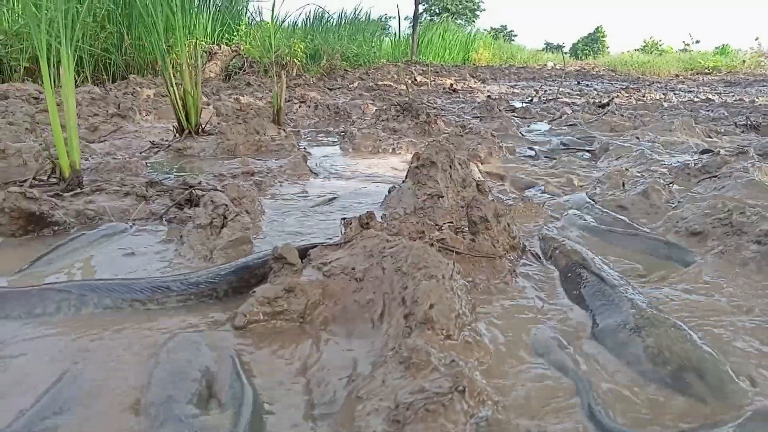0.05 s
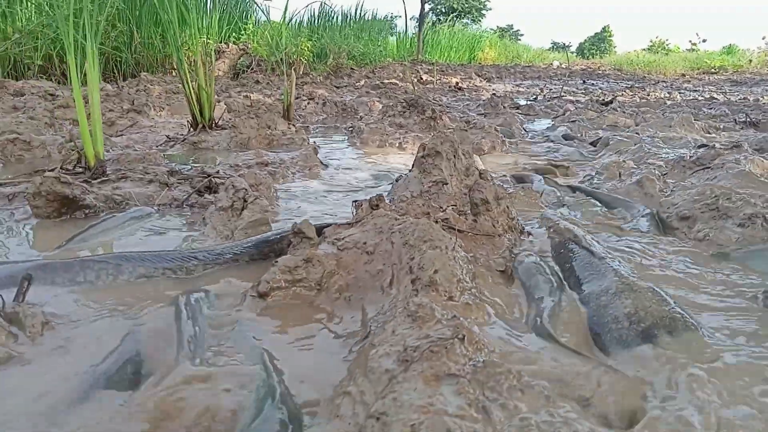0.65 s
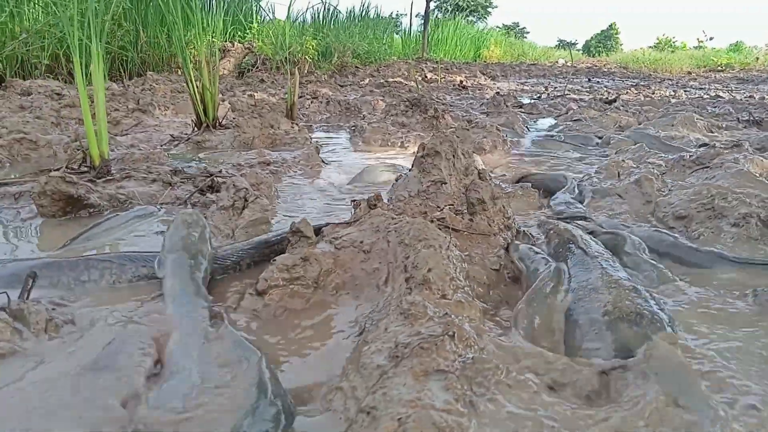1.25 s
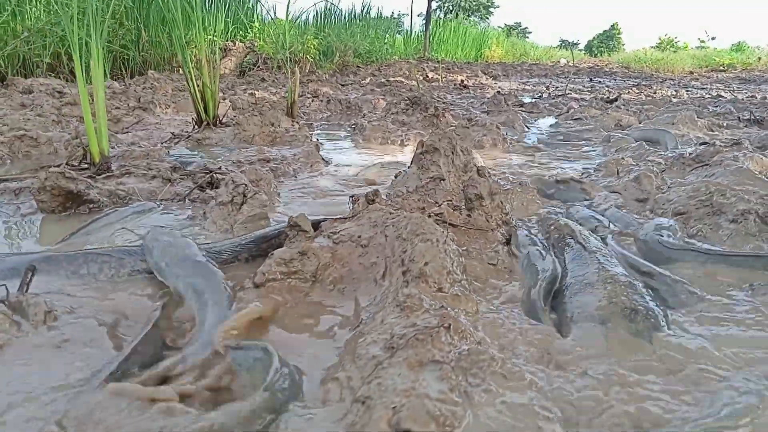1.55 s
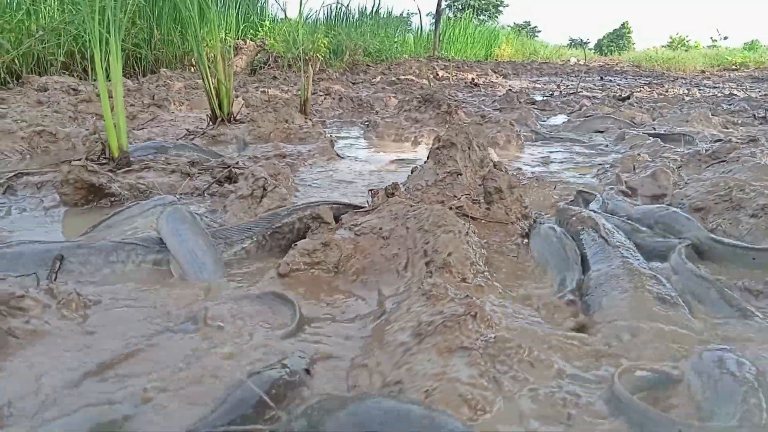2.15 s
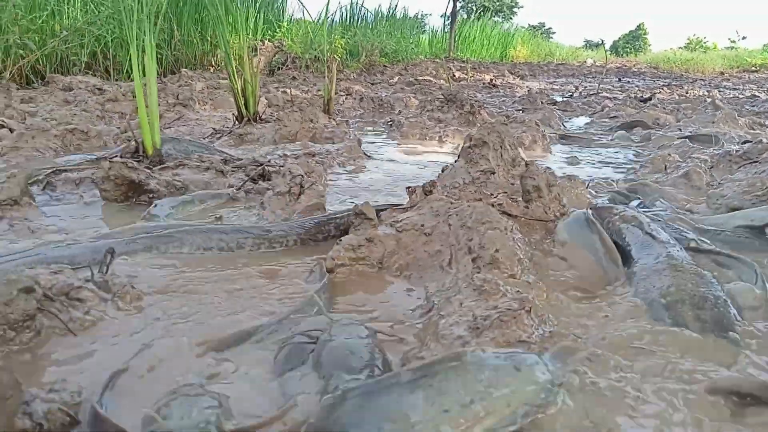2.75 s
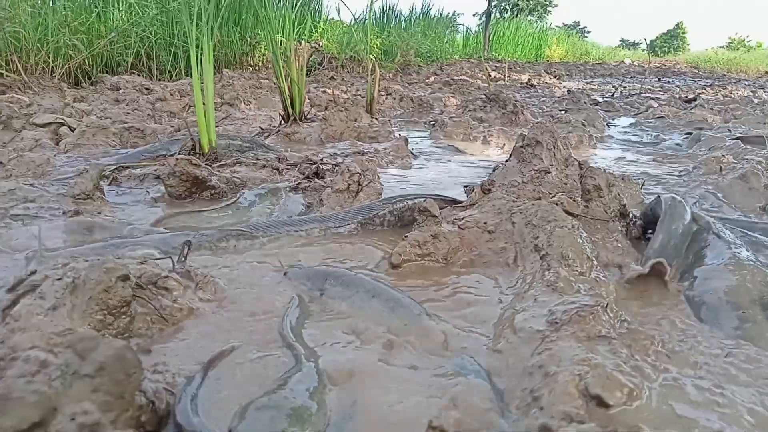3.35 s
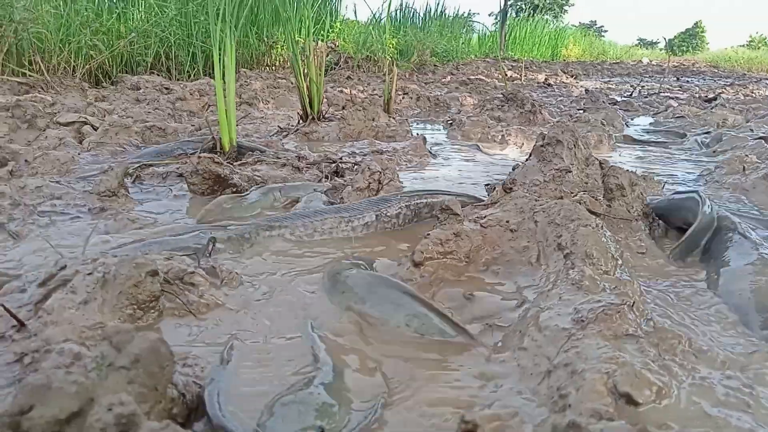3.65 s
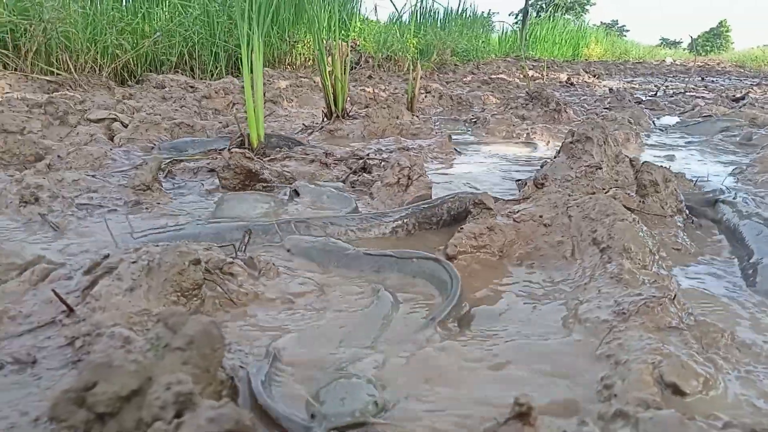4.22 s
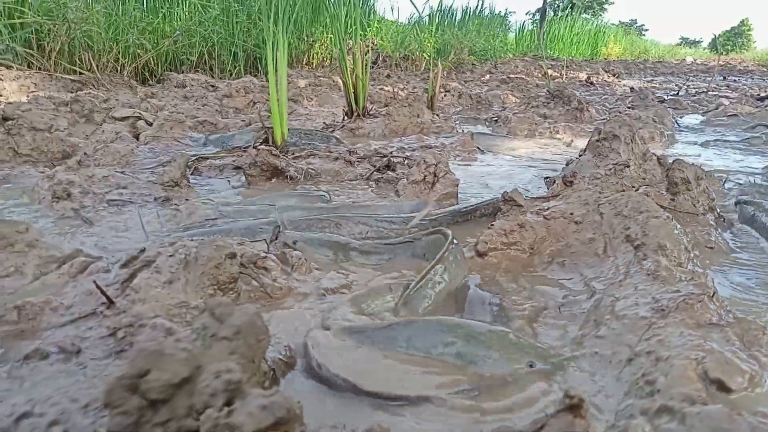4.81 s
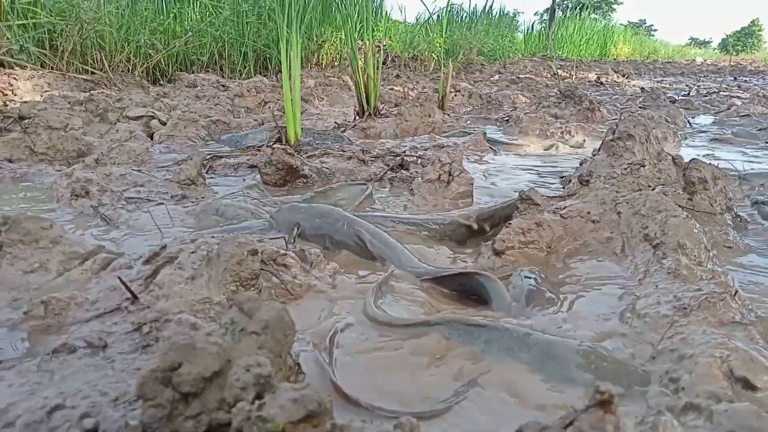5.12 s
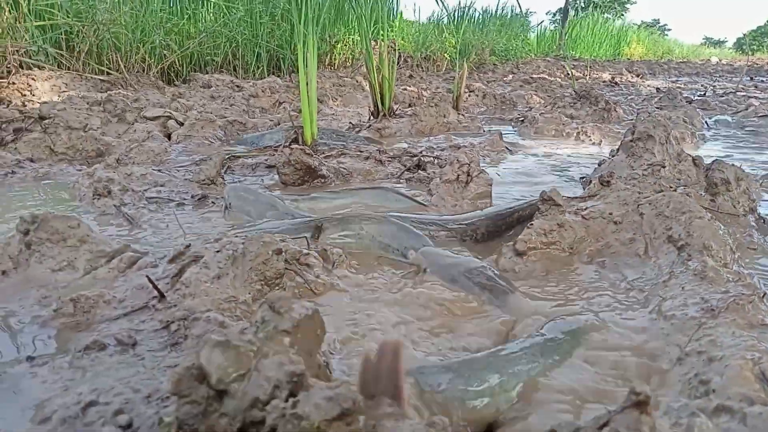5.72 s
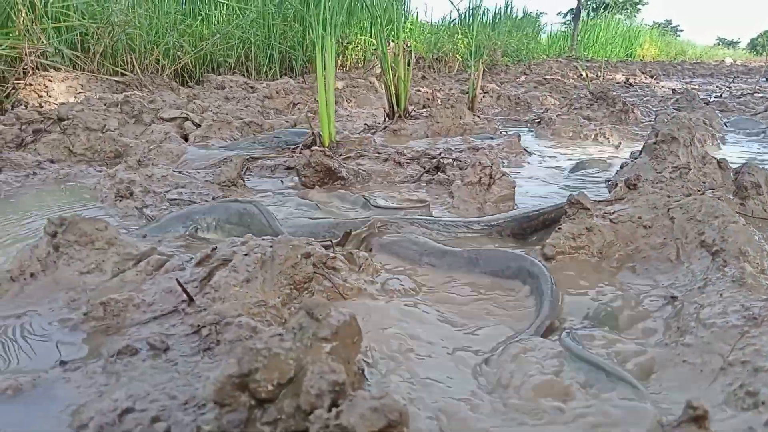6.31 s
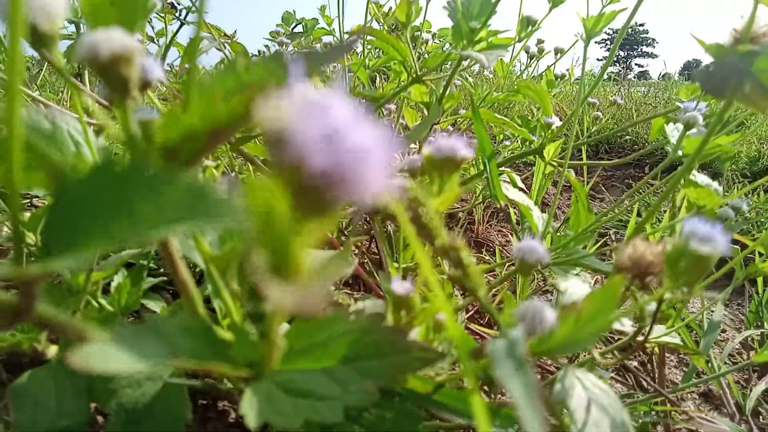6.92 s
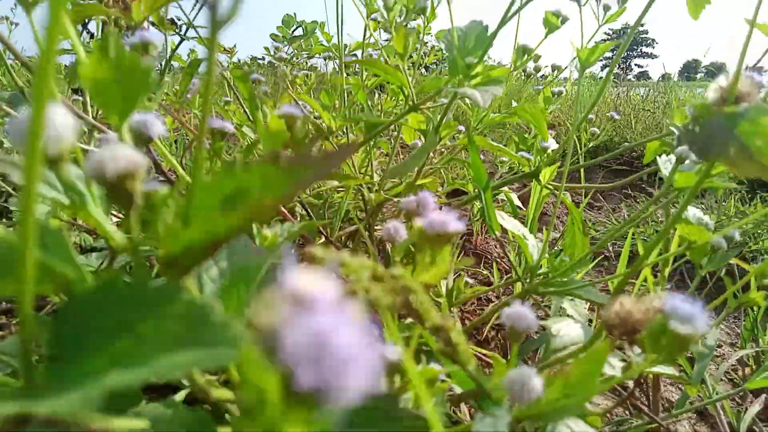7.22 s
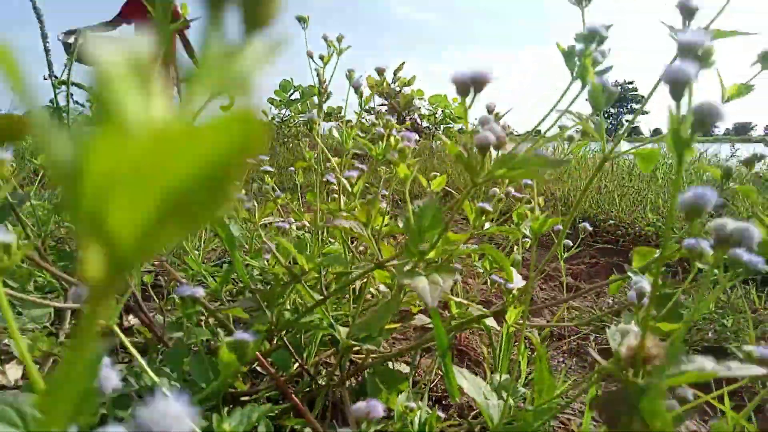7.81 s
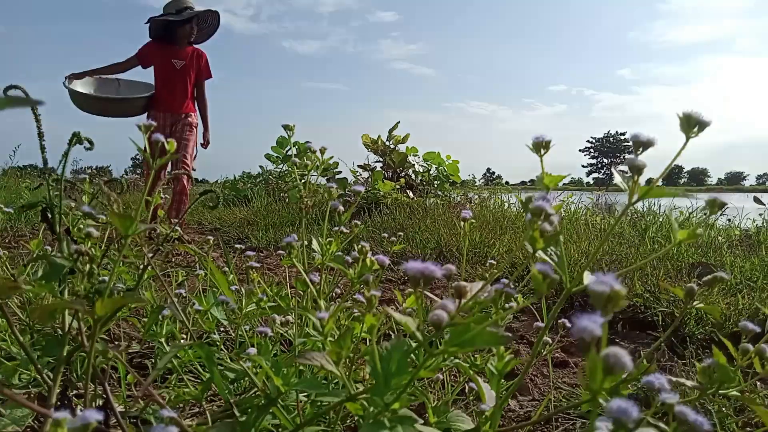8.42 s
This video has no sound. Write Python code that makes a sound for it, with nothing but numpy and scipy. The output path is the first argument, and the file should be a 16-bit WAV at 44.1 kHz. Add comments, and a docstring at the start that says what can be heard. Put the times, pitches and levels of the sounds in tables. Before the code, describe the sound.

Fish thrash close by in a shallow mud puddle, sloshing the water with quick pops, gurgles, drips and wet smacks. Midway, their tails thud and the mud rumbles softly. A small bird chirps faintly over open air and a low hum. Near the end the water sounds cut off, leaving a quiet meadow with swishing plants, far scuffs in the grass, a faint high buzz and one more chirp.

```python
"""Catfish thrash in a shallow mud puddle beside a rice field, over open air and a low hum.
From the start the water sloshes and froths, and air trapped by their bodies gurgles and pops as bubbles.
Wet skin smacks out of the mud and tails thud on the bed; from about 3 s shoving bodies make it rumble.
A small bird first chirps at 5.4 s. Near 6.9 s the puddle sounds cut off, and one hears quiet meadow air,
swishing plants, far scuffs in the grass, a faint high buzz and one more chirp."""
import sys
import numpy as np
from scipy import signal
from scipy.fft import rfft, irfft, next_fast_len
from scipy.io import wavfile

SR = 44100
rng = np.random.default_rng(int(sys.argv[2]) if len(sys.argv) > 2 else 0)


def persist_wave(psi):
    """Save psi, clipped to +-1, as 16-bit WAV."""
    counts = np.round(np.clip(psi, -1, 1) * 32767).astype(np.int16)
    wavfile.write(sys.argv[1], SR, np.atleast_2d(counts).T)


N = 377483
TIME = np.arange(N) / SR
PUDDLE_END_S = 6.83


def from_db(db):
    """Decibels to gain."""
    return 10 ** (np.asarray(db) / 20)


def unit_rms(x):
    """Scale to rms 1."""
    return x / np.sqrt(np.mean(x ** 2) + 1e-20)


def curves(rows):
    """Each column after time_s, interpolated to every sample."""
    time_s, *columns = np.transpose(rows)
    return [np.interp(TIME, time_s, column) for column in columns]


def value_at(curve, time_s):
    """One sample of a curve."""
    return curve[min(int(time_s * SR), N - 1)]


def add(out, start_s, sound):
    """Mix a short sound in."""
    start = int(np.clip(round(start_s * SR), 0, N - 1))
    out[start:start + len(sound)] += sound[:N - start]


def sine(pitch_hz):
    """Sine following a pitch curve."""
    return np.sin(2 * np.pi * np.cumsum(pitch_hz) / SR)


def drift(rate_hz):
    """Smooth random wander, rms 1."""
    size = next_fast_len(N)
    hz = np.arange(size // 2 + 1) * SR / size
    spectrum = rfft(rng.standard_normal(size)) / (1 + (hz / rate_hz) ** 2)
    return unit_rms(irfft(spectrum, size)[:N])


def coloured(x, spectrum):
    """Filter by a (freq_hz, gain_db) curve, falling 24 dB/octave past its ends; rms 1."""
    size = next_fast_len(N)
    log_hz = np.log2(np.maximum(np.arange(size // 2 + 1) * SR / size, 1))
    freq_hz, gain_db = np.transpose(spectrum)
    knots = np.log2(freq_hz)
    outside_oct = np.abs(log_hz - np.clip(log_hz, knots[0], knots[-1]))
    gain = from_db(np.interp(log_hz, knots, gain_db) - 24 * outside_oct)
    return unit_rms(irfft(rfft(x, size) * gain, size)[:N])


def noise(spectrum):
    """Steady coloured noise, rms 1."""
    return coloured(rng.standard_normal(N), spectrum)


def band(x, centre_hz, width_oct, order=1):
    """Band-pass, width_oct either side of the centre."""
    edges_hz = np.clip(centre_hz * 2 ** (width_oct * np.array([-1, 1])), 100, .45 * SR)
    return signal.sosfilt(signal.butter(order, edges_hz, "band", fs=SR, output="sos"), x)


def ticks(size, per_s, spread_db):
    """Random clicks of either sign: many faint, a few sharp."""
    strength = from_db(spread_db * np.minimum(rng.exponential(1, size), 3))
    sign = rng.choice([-1, 1], size)
    return strength * sign * (rng.random(size) < per_s / SR)


def bubble(pitch_hz, life_s, rise_per_s, onset_per_cycle=2.6, wobble=.027, ragged_db=3.5):
    """An air pocket rings, climbs in pitch as it surfaces and dies ever faster as its film opens."""
    t = np.arange(int(life_s * SR) + 2) / SR
    cycles = pitch_hz * t
    # shifting mud squeezes level and pitch every few cycles
    squeeze = np.interp(cycles / 3, np.arange(24), rng.standard_normal(24)) * np.minimum(cycles / 6, 1)
    onset = 1 - np.exp(-onset_per_cycle * cycles)
    decay = from_db(ragged_db * squeeze - 60 * (t / life_s) ** 1.99)
    return onset * decay * sine(pitch_hz * (1 + rise_per_s * t + wobble * squeeze))


# Open air spectrum: freq_hz, gain_db
AIR_SPECTRUM = [(20, -48), (35, -45), (65, -11), (100, -3), (135, -0.5), (200, -10.5), (320, -15),
                (600, -18), (1100, -23.5), (2600, -30.5), (4000, -37), (6000, -46.5)]

def air(level_db=-52, drop_db=1.5, quieter_from_s=6.7):
    """Meadow air, slightly quieter near the end."""
    return from_db(level_db - drop_db * (TIME > quieter_from_s)) * noise(AIR_SPECTRUM)


def hum(level_db=-60, pitch_hz=137, width_hz=26):
    """A far, wavering hum."""
    return from_db(level_db) * unit_rms(drift(width_hz) * np.sin(2 * np.pi * pitch_hz * TIME))


# How hard the fish churn the water: time_s, level_db
CHURN_CURVE = [(0.04, -50.5), (0.45, -53.5), (0.6, -52), (0.76, -48.5), (1.21, -54), (1.47, -49),
               (1.69, -50), (2.16, -49), (2.31, -47.5), (2.68, -49), (3.14, -48), (3.5, -50.5), (3.89, -51),
               (4.22, -50.5), (4.43, -50.5), (6.03, -53), (6.63, -51.5), (6.72, -49.5)]
# Far splash spectrum: freq_hz, gain_db
SLOSH_SPECTRUM = [(200, 0), (400, 2.5), (700, 0), (1200, -5), (2400, -1.5), (3500, -8.5), (4500, -15),
                  (6000, -46)]

def slosh(churn_db, gain_db=-3, flicker_db=3.3, flicker_hz=55):
    """Farther splashes merge into a soft wash, each band flickering on its own."""
    wash = np.zeros(N)
    for centre_hz in np.geomspace(280, 4500, 7):
        splash = band(rng.standard_normal(N), centre_hz, 1 / 3, order=2)
        wash += splash * from_db(flicker_db * drift(flicker_hz))
    gate = np.clip((PUDDLE_END_S - TIME) / .024, 0, 1)
    return gate * from_db(churn_db + gain_db) * coloured(wash, SLOSH_SPECTRUM)


# Froth on the puddle: time_s, level_db
FROTH_CURVE = [(0, -60), (.57, -61.5), (1.5, -59), (3.2, -55.5), (4.6, -62.5), (6.8, -62), (6.86, -65.5),
               (7.05, -73), (8.56, -74.5)]
# Froth spectrum: freq_hz, gain_db
FROTH_SPECTRUM = [(3000, 11.5), (4500, -3), (6000, -3.5), (7000, -0.5), (7900, 5), (9000, -4.5),
                  (10200, -11.5), (11400, -8.5), (12500, -9), (15500, -7)]

def froth(froth_db, grain_db=2, surge_db=1.5):
    """Bursting foam: a fine-grained hiss in small surges."""
    foam = rng.standard_normal(N) * from_db(grain_db * drift(rate_hz=370))
    return from_db(froth_db + surge_db * drift(rate_hz=19)) * coloured(foam, FROTH_SPECTRUM)


def small_bubbles(churn_db, count, gain_db, spread_db, centre_hz, spread_oct, cycles, max_rise_per_s):
    """Scattered bubbles choked by thick mud; smaller ones ring higher and shorter."""
    out = np.zeros(N)
    uniform = rng.random((count, 2))
    normal = np.clip(rng.standard_normal((count, 3)), -1.7, 1.7)
    for (when, climb), (loudness, pitch, ring) in zip(uniform, normal):
        start_s = when * (PUDDLE_END_S - .02)
        pitch_hz = centre_hz * 2 ** (spread_oct * pitch)
        level_db = value_at(churn_db, start_s) + gain_db + spread_db * loudness
        level_db -= 14 * max(np.log2(pitch_hz / 3600), 0)   # tiny bubbles hold little energy
        life_s = min(cycles * 1.5 ** ring, 18) / pitch_hz
        plink = bubble(pitch_hz, life_s, max_rise_per_s * climb, onset_per_cycle=1.2, wobble=.08)
        add(out, start_s, from_db(level_db) * plink)
    return out


def spits(froth_db, count=150, gain_db=5, spread_db=5.2, low_hz=4800, span_oct=1.13, spurt_s=.03):
    """Pinhead bubbles burst on slimy skin in spurts of three: many faint, a few sharp."""
    out = np.zeros(N)
    starts_s = rng.random(count) * (PUDDLE_END_S - spurt_s)
    for start_s, spurt in zip(starts_s, rng.random((count, 3, 3))):
        for delay, pitch, rarity in spurt:
            pitch_hz = low_hz * 2 ** (span_oct * pitch ** 2)
            level_db = value_at(froth_db, start_s) + gain_db - spread_db * np.log(max(rarity, .04))
            tick = bubble(pitch_hz, life_s=6 / pitch_hz, rise_per_s=0)
            add(out, start_s + spurt_s * delay, from_db(level_db) * tick)
    return out


def droplets(churn_db, count=150, gain_db=-4, spread_db=10.5, low_hz=2800, span_oct=1.36, min_cycles=19):
    """Flung specks of water land with tiny pips; the higher, the fainter."""
    out = np.zeros(N)
    for when, pitch, loudness, ring in rng.random((count, 4)):
        start_s = when * (PUDDLE_END_S - .02)
        pitch_hz = low_hz * 2 ** (span_oct * pitch ** 1.5)
        level_db = value_at(churn_db, start_s) + gain_db + spread_db * (2 * loudness - 1)
        level_db -= 6 * np.log2(pitch_hz / low_hz)
        life_s = min_cycles * (1 + ring) / pitch_hz
        add(out, start_s, from_db(level_db) * bubble(pitch_hz, life_s, rise_per_s=14, onset_per_cycle=.64))
    return out


# Surfacing bubbles: start_s, level_db, pitch_hz, life_s, rise_per_s
GURGLE_EVENTS = [(0.001, -29, 784, 0.011, 50), (0.574, -36.5, 1210, 0.014, 42),
                 (0.717, -37.5, 2950, 0.015, 56), (0.838, -40, 1660, 0.012, 65),
                 (0.865, -38, 2980, 0.015, 30), (1.103, -35, 1060, 0.038, 73),
                 (1.242, -40.5, 1360, 0.033, 44), (1.35, -37.5, 1140, 0.048, 70),
                 (1.409, -37.5, 870, 0.015, 17), (1.6, -40.5, 1100, 0.059, 32),
                 (1.744, -31, 1170, 0.037, 36), (2.461, -40, 2510, 0.038, 41),
                 (2.63, -35.5, 1400, 0.01, 44), (2.895, -40, 1580, 0.032, 35),
                 (2.958, -38.5, 1030, 0.036, 48), (3.008, -30.5, 1386, 0.02, 32),
                 (3.276, -37, 570, 0.024, 47), (3.302, -35, 960, 0.022, 35), (3.36, -36, 644, 0.026, 29),
                 (3.4384, -42, 677, 0.046, 43), (3.514, -23, 3650, 0.0073, 13),
                 (3.626, -37, 840, 0.013, 43), (4.022, -43, 630, 0.047, 23), (4.068, -29, 2010, 0.01, 25),
                 (4.178, -43, 800, 0.031, 69), (4.311, -43, 1300, 0.021, 40)]

def gurgles(gain_db=.5):
    """Big close bubbles swell and glide up unsteadily as they surface."""
    out = np.zeros(N)
    for start_s, level_db, pitch_hz, life_s, rise_per_s in GURGLE_EVENTS:
        ring = bubble(pitch_hz, life_s, rise_per_s, onset_per_cycle=1, wobble=.085, ragged_db=3.6)
        add(out, start_s, from_db(level_db + gain_db) * ring)
    return out


# Mud peeling off a body: start_s, length_s, level_db, centre_hz
SPATTER_EVENTS = [(0.01, 0.032, -49, 3650), (0.058, 0.039, -45, 2820), (0.763, 0.017, -54, 4460),
                  (0.87, 0.034, -52, 2880), (2.392, 0.029, -41, 1250), (2.435, 0.05, -55, 3400),
                  (3.042, 0.017, -47, 3040), (3.135, 0.031, -42, 2780), (3.203, 0.0099, -42, 3040),
                  (3.239, 0.013, -38.5, 3020), (3.281, 0.0065, -38.5, 3340), (4.465, 0.0074, -48.5, 4500),
                  (4.808, 0.017, -47.5, 3400), (5.486, 0.027, -44.5, 2000), (6.683, 0.015, -52, 3180),
                  (6.743, 0.011, -42.5, 2860)]

def spatters(gain_db=-4, attack_s=.0016, release_s=.0036, width_oct=.28):
    """Threads of mud break one after another in a ragged run of ticks."""
    out, t = np.zeros(N), np.arange(SR // 10) / SR
    for start_s, length_s, level_db, centre_hz in SPATTER_EVENTS:
        run = band(ticks(len(t), per_s=900, spread_db=4.5), centre_hz, width_oct, order=2)
        envelope = np.minimum(t / attack_s, 1) * np.exp(-np.maximum(t - length_s, 0) / release_s)
        add(out, start_s, from_db(level_db + gain_db) * envelope * unit_rms(run))
    return out


# Popping air pockets: start_s, level_db, pitch_hz, life_s
POP_EVENTS = [(0.023, -32.5, 3960, 0.0053), (0.058, -35.5, 1380, 0.0083), (0.158, -38.5, 1270, 0.016),
              (0.1794, -34, 3080, 0.011), (0.194, -42, 2900, .008), (0.253, -29, 1830, 0.0066),
              (0.2647, -21.5, 2570, 0.012), (0.313, -23.5, 3120, 0.0036), (0.349, -19, 3360, 0.004),
              (0.347, -32, 1880, 0.0081), (0.382, -17.5, 880, 0.0033), (0.3857, -20.5, 1630, 0.0065),
              (0.62, -23.5, 1980, 0.0026), (0.745, -28.5, 3250, 0.0032), (0.818, -30.5, 1830, 0.0063),
              (0.834, -25, 2240, 0.003), (0.889, -40, 1765, 0.015), (0.933, -27, 4300, 0.0025),
              (0.973, -30, 2095, 0.024), (1.221, -26.5, 2540, 0.0041), (1.238, -31, 2170, 0.0055),
              (1.2547, -34.5, 995, 0.014), (1.277, -38, 1550, 0.011), (1.407, -33, 3880, .006),
              (1.44, -36, 2240, .007), (1.537, -27.5, 2610, 0.012), (1.5542, -20.5, 3000, 0.005),
              (1.6688, -21.5, 1100, 0.0073), (1.669, -22, 2990, 0.0047), (1.72, -27, 3700, 0.003),
              (1.801, -35, 3220, 0.0055), (1.83, -34.5, 1730, 0.0083), (1.859, -23, 3560, 0.0027),
              (1.953, -38, 2970, 0.0096), (2.11, -25, 1730, .002), (2.239, -32.5, 4240, 0.0053),
              (2.262, -6, 2340, 0.0012), (2.293, -25, 2600, 0.0066), (2.311, -32, 1950, 0.0077),
              (2.3285, -18.5, 2510, 0.0043), (2.376, -28, 417, .004), (2.3769, -14, 3240, 0.0068),
              (2.379, -6.5, 1960, 0.002), (2.3804, -10, 3770, 0.0062), (2.4105, -26, 3430, 0.0049),
              (2.415, -22, 3020, 0.01), (2.421, -6.5, 3120, 0.0023), (2.507, -30, 3340, 0.0073),
              (2.73, -38, 1620, .008), (2.8428, -25, 3700, 0.0043), (2.908, -31, 1900, 0.013),
              (2.984, -25, 3740, 0.0086), (3.0285, -21, 4260, 0.0017), (3.074, -40, 1280, .02),
              (3.1377, -32, 2430, 0.0095), (3.1427, -16, 2540, 0.0032), (3.1745, -14, 2000, 0.0017),
              (3.192, -23, 3500, 0.0021), (3.309, -32, 2090, 0.014), (3.357, -16.5, 3920, 0.0019),
              (3.506, -19.5, 2960, 0.0045), (3.59, -25.5, 2630, 0.0029), (3.621, -34, 905, 0.0079),
              (3.726, -35, 2420, 0.0052), (3.7553, -29, 2960, 0.0075), (3.829, -26.5, 3000, 0.0019),
              (3.921, -37, 3080, 0.0087), (4, -38, 4400, 0.0037), (4.099, -31.5, 2260, 0.0067),
              (4.141, -36, 3380, 0.006), (4.26, -21.5, 1880, 0.0036), (4.282, -36, 2730, .009),
              (4.469, -34, 2800, 0.017), (4.807, -32, 3190, 0.0057), (4.926, -16, 1760, 0.0021),
              (5.072, -33.5, 1220, 0.022), (5.366, -35, 1274, 0.012), (5.367, -37.5, 2730, 0.0095),
              (5.399, -37.5, 1700, 0.014), (5.408, -30.5, 3200, 0.0061), (5.4815, -22.5, 1640, 0.0061),
              (5.483, -31, 1960, 0.0067), (5.547, -36, 2160, 0.0075), (5.6791, -39, 1630, 0.016),
              (5.68, -33.5, 2660, 0.005), (6.04, -38, 990, 0.008), (6.259, -38, 2470, 0.0072),
              (6.333, -29, 4100, 0.0043), (6.575, -35.5, 2550, 0.0049), (6.722, -33, 3900, 0.0034),
              (6.7295, -24.5, 1460, 0.0083), (6.735, -29, 1620, 0.0096), (6.777, -33, 733, 0.011),
              (6.795, -29.5, 3150, 0.0028)]

def pops():
    """Close air pockets ring at once and nearly hold their pitch."""
    out = np.zeros(N)
    for start_s, level_db, pitch_hz, life_s in POP_EVENTS:
        ring = bubble(pitch_hz, life_s, rise_per_s=.78, onset_per_cycle=1.3, wobble=.04)
        add(out, start_s, from_db(level_db) * ring)
    return out


def squelches(gain_db=-32, follow=.61, delay_s=.003, t60_s=.043, width_oct=.63):
    """Mud closes behind each pop and gurgle: dying sticky ticks around its pitch."""
    out, t = np.zeros(N), np.arange(SR // 14) / SR
    for start_s, parent_db, parent_hz, *_ in POP_EVENTS + GURGLE_EVENTS:
        run = band(ticks(len(t), per_s=600, spread_db=4), parent_hz, width_oct, order=2)
        envelope = from_db(gain_db + follow * parent_db - 60 * t / t60_s)
        add(out, start_s + delay_s, envelope * unit_rms(run))
    return out


def afterpops(count=2, gain_db=-33, follow=.25, within_s=.04, spread_oct=.6):
    """Each pop and gurgle shakes loose lesser bubbles near its own pitch."""
    out, parents = np.zeros(N), POP_EVENTS + GURGLE_EVENTS
    for (start_s, parent_db, parent_hz, *_), brood in zip(parents, rng.random((len(parents), count, 2))):
        for delay, pitch in brood:
            pitch_hz = parent_hz * 2 ** (spread_oct * (2 * pitch - 1))
            gain = from_db(gain_db + follow * parent_db) / (1 + delay)
            ring = bubble(pitch_hz, life_s=13 / pitch_hz, rise_per_s=32)
            add(out, start_s + within_s * delay, gain * ring)
    return out


# Flat smacks on mud: start_s, level_db, t60_s
SMACK_EVENTS = [(0.348, -26, 0.0051), (0.382, -18.5, 0.0086), (0.9742, -25, 0.0067), (1.22, -31.5, 0.027),
                (1.67, -18, 0.0071), (2.377, -14, 0.023), (3.008, -17.5, 0.0074), (3.301, -35, 0.014),
                (3.355, -28, 0.012), (5.4818, -27, 0.0099), (6.73, -31, 0.0053), (6.78, -37, 0.0059)]
# Smack spectrum: freq_hz, gain_db
SMACK_SPECTRUM = [(150, -32), (380, 22), (700, 0), (1500, 15.5), (3800, 11), (5200, -31), (8000, -8),
                  (15000, -41)]

def smacks(gain_db=-2.5, attack_s=.00038):
    """A tail hits wet mud: a broad burst, damped at once."""
    envelope, t = np.zeros(N), np.arange(SR // 10) / SR
    onset = 1 - np.exp(-t / attack_s)
    for start_s, level_db, t60_s in SMACK_EVENTS:
        add(envelope, start_s, onset * from_db(level_db + gain_db - 60 * t / t60_s))
    return envelope * noise(SMACK_SPECTRUM)


# Wet films snapping: start_s, level_db, centre_hz
SNAP_EVENTS = [(0.349, -30, 6440), (0.457, -39.5, 7100), (0.898, -37.5, 7200), (1.485, -34, 14400),
               (1.567, -35.5, 7900), (1.942, -31.5, 4200), (2.953, -39, 13600), (2.985, -31, 7400),
               (3.009, -24.5, 10900), (3.288, -38, 5800), (3.355, -29.5, 5640), (3.752, -38.5, 6660),
               (4.953, -43, 8200), (5.169, -39, 6600), (5.391, -44, 12000), (5.702, -40, 14600)]

def snaps(t60_s=.011, width_oct=.17):
    """A film of slime tears in a brief, bright crackle."""
    out, t = np.zeros(N), np.arange(SR // 40) / SR
    for start_s, level_db, centre_hz in SNAP_EVENTS:
        crackle = band(rng.standard_normal(len(t)) * from_db(-60 * t / t60_s), centre_hz, width_oct)
        add(out, start_s, from_db(level_db) * crackle / np.abs(crackle).max())
    return out


# Tails against the bed: centre_s, level_db, pitch_hz
THUD_EVENTS = [(0.594, -31.5, 418), (0.614, -37.5, 190), (2.378, -25.5, 332), (2.901, -29, 137),
               (2.939, -21.5, 196), (2.996, -29.5, 122), (3.447, -31, 184), (3.593, -27, 150),
               (3.615, -24.5, 130), (3.634, -25, 141), (3.853, -29.5, 115), (4.327, -26, 107),
               (4.395, -28.5, 98), (4.411, -31.5, 133), (4.756, -28.5, 96), (5.146, -21, 131),
               (5.162, -22.5, 100), (5.184, -16.5, 108), (5.23, -27, 160), (5.374, -35.5, 101)]

def thuds(width_cycles=.59, sag_per_s=5.2, bed_db=-13.5, bed_hz=70):
    """A soft two-cycle push sags in pitch; under the low ones the mud sways lower and longer."""
    out, t = np.zeros(N), np.arange(-SR // 30, SR // 30) / SR
    sway = from_db(bed_db) * np.exp(-(t * bed_hz) ** 2) * np.cos(2 * np.pi * bed_hz * t)
    for centre_s, level_db, pitch_hz in THUD_EVENTS:
        cycles = pitch_hz * t
        push = np.exp(-(cycles / width_cycles) ** 2) * np.sin(2 * np.pi * cycles * (1 - sag_per_s * t))
        add(out, centre_s + t[0], from_db(level_db) * (sway * (pitch_hz < 2 * bed_hz) - push))
    return out


def swell(start_s, length_s, attack_s, release_s):
    """Exponential rise up to start_s, hold, exponential decay."""
    rise = np.minimum((TIME - start_s) / attack_s, 0)
    fall = np.maximum((TIME - start_s - length_s) / release_s, 0)
    return np.exp(np.maximum(rise - fall, -30))


# Bodies shoving through mud: start_s, length_s, level_db
SHOVE_EVENTS = [(2.932, 0.09, -37), (3.214, 0.12, -43), (3.547, 0.1, -42), (3.702, 0.038, -41.5),
                (4.154, 0.06, -46.5), (4.388, 0.038, -42), (4.727, 0.078, -39.5), (4.901, 0.17, -40),
                (5.136, 0.16, -43), (5.593, 0.047, -48.5)]
# Mud rumble spectrum: freq_hz, gain_db
HEAVE_SPECTRUM = [(20, -34), (45, -11), (68, 0), (85, 1.5), (140, -4.5), (250, -14.5), (500, -25)]

def heave(quiver_db=-53):
    """The mud rumbles under each shove and quivers while the fish are close."""
    push = sum(from_db(level_db) * swell(start_s, length_s, attack_s=.0061, release_s=.012)
               for start_s, length_s, level_db in SHOVE_EVENTS)
    quiver = from_db(quiver_db) * swell(start_s=2.68, length_s=2.7, attack_s=.58, release_s=.58)
    return np.hypot(push, quiver) * noise(HEAVE_SPECTRUM)


# Arched chirps: top_s, top_hz, level_db
CHIRP_EVENTS = [(5.449, 5180, -55), (6.075, 5180, -55.5), (7.774, 4120, -50)]

def bird(rise_s=.14, fall_s=.07, peak_delay_s=.02, width_s=.031):
    """Each chirp climbs softly to its top, then swells as it drops, blurred by distance."""
    out, t = np.zeros(N), np.arange(-SR // 14, SR // 14) / SR
    waver = 1 + .028 * drift(rate_hz=250)[:len(t)]
    arch = np.exp(-(t / np.where(t < 0, rise_s, fall_s)) ** 2)
    envelope = np.exp(-((t - peak_delay_s) / width_s) ** 2)
    for top_s, top_hz, level_db in CHIRP_EVENTS:
        add(out, top_s + t[0], from_db(level_db) * envelope * sine(top_hz * waver * arch))
    return scattered(out, tail_db=0, t60_s=.06, cutoff_hz=7000) / 2


# Plants brushing past: time_s, level_db
SWISH_CURVE = [(6.6, -90), (6.8, -94), (6.96, -58.5), (7.02, -85), (7.98, -73), (8.08, -60.5), (8.15, -52),
               (8.26, -74)]
# Swish spectrum: freq_hz, gain_db
SWISH_SPECTRUM = [(600, 18), (1500, 9), (2200, 8), (3300, 15), (4500, 12), (6000, -3.5), (8000, 0.5),
                  (10500, -25), (15000, -10)]

def swish():
    """Brushing plants: two short swells of noise."""
    level_db, = curves(SWISH_CURVE)
    return from_db(level_db) * noise(SWISH_SPECTRUM)


# Far scuffs in the grass: centre_s, level_db, width_s, centre_hz
SCUFF_EVENTS = [(7.051, -54, 0.015, 1150), (7.157, -59.5, 0.017, 760), (8.16, -48.5, 0.0067, 995),
                (8.431, -60.5, 0.013, 1080)]

def scuffs(width_oct=.28):
    """Little rubs swell and fade, each in its own band."""
    out, t = np.zeros(N), np.arange(-SR // 12, SR // 12) / SR
    for centre_s, level_db, width_s, centre_hz in SCUFF_EVENTS:
        rub = unit_rms(band(rng.standard_normal(len(t)), centre_hz, width_oct, order=2))
        add(out, centre_s + t[0], from_db(level_db) * np.exp(-(t / width_s) ** 2) * rub)
    return out


# Faint, very high buzz: time_s, pitch_hz, level_db
BUZZ_CURVE = [(7.25, 13200, -86), (7.3, 14600, -77), (7.42, 14200, -77), (7.48, 15350, -75),
              (7.53, 14300, -78), (7.63, 13900, -77), (7.71, 14550, -80), (7.82, 13900, -75),
              (7.86, 13300, -95)]
# Its strands: pitch_ratio, gain_db
BUZZ_STRANDS = [(1, -4), (0.99, -6), (0.93, -6), (0.81, -10), (0.68, -10.5)]

def high_buzz(waver=.012, flicker_db=7, rasp=.6):
    """Thin tones waver along one pitch curve, each flickering in and out of a fine rasp."""
    out = np.zeros(N)
    pitch_hz, level_db = curves(BUZZ_CURVE)
    for pitch_ratio, gain_db in BUZZ_STRANDS:
        tone = sine(pitch_ratio * pitch_hz * (1 + waver * drift(rate_hz=30)))
        flicker = from_db(flicker_db * (np.minimum(drift(rate_hz=45), 1.2) - .6))
        out += from_db(level_db + gain_db) * (flicker + rasp * drift(rate_hz=700)) * tone
    return out * (TIME > BUZZ_CURVE[0][0]) * (TIME < BUZZ_CURVE[-1][0])


def wake(depth_db=6, attack_s=.027, release_s=.025):
    """Livelier water around each pop, gurgle and smack: a level offset in dB, mean 0."""
    starts_s = np.array([row[0] for row in POP_EVENTS + GURGLE_EVENTS + SMACK_EVENTS])
    grid_s = TIME[::64]
    since_s = grid_s[:, None] - starts_s
    nearness = np.exp(-np.abs(since_s) / np.where(since_s < 0, attack_s, release_s))
    lift_db = depth_db * nearness.max(axis=1)
    return np.interp(TIME, grid_s, lift_db - lift_db.mean())


def muffled(x, edge_hz=4350, leak_db=-12.5):
    """Dulls the bubbles: treble falls steeply above about 4.3 kHz; a little leaks through."""
    dull = signal.sosfilt(signal.butter(6, edge_hz, fs=SR, output="sos"), x)
    return dull + from_db(leak_db) * band(x, 2 * edge_hz, width_oct=.39)


def scattered(x, tail_db=-8, t60_s=.033, cutoff_hz=3500):
    """Mud banks and stalks scatter a short, dull tail."""
    t = np.arange(SR // 6) / SR
    tail = rng.standard_normal(len(t)) * from_db(-60 * t / t60_s) * (t > .0015)
    tail = signal.lfilter(*signal.butter(1, cutoff_hz, fs=SR), tail / np.linalg.norm(tail))
    return x + from_db(tail_db) * signal.fftconvolve(x, tail)[:N]


def scene():
    """The puddle in its field, mono."""
    churn_db, = curves(CHURN_CURVE)
    froth_db, = curves(FROTH_CURVE)
    wake_db = wake()
    glugs = small_bubbles(churn_db, count=60, gain_db=3.5, spread_db=6,
                          centre_hz=640, spread_oct=.36, cycles=9.5, max_rise_per_s=17)
    fizz = spits(froth_db + wake_db) + droplets(churn_db + wake_db)
    close_bubbles = pops() + gurgles() + afterpops()
    plinks = small_bubbles(churn_db + wake_db, count=480, gain_db=2.5, spread_db=3.5,
                           centre_hz=2300, spread_oct=.703, cycles=13.4, max_rise_per_s=50)
    bubbling = muffled(close_bubbles + glugs + plinks + squelches())
    thrashing = scattered(bubbling + fizz + spatters() + smacks() + snaps())
    ground = thuds() + heave()
    water = slosh(churn_db + .19 * wake_db) + froth(froth_db)
    meadow = hum() + swish() + air() + bird() + high_buzz() + scuffs()
    return (thrashing + ground + water + meadow)[None]


def record(dry, cutoff_hz=15800):
    """Steep low-pass on the top treble."""
    return signal.sosfilt(signal.ellip(10, .2, 70, cutoff_hz, fs=SR, output="sos"), dry)


dry = scene()
out = record(dry)
persist_wave(out)
```